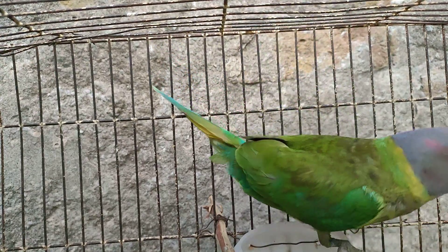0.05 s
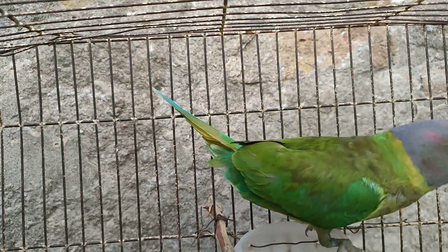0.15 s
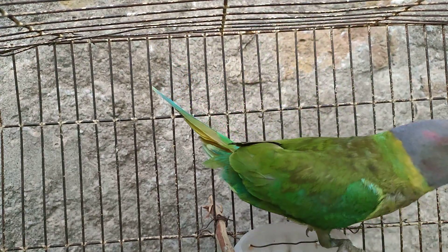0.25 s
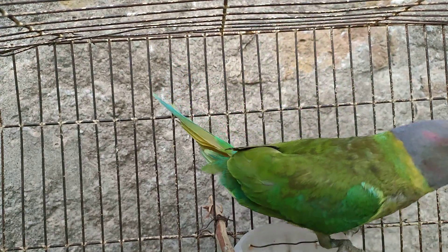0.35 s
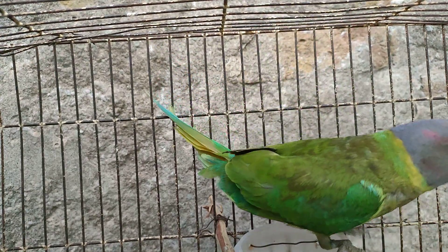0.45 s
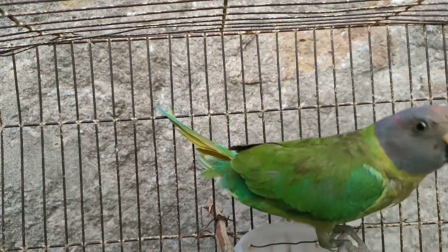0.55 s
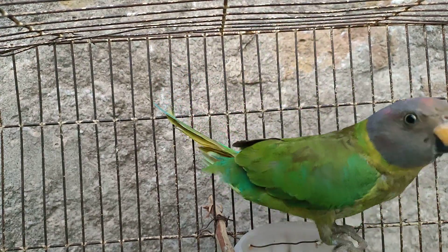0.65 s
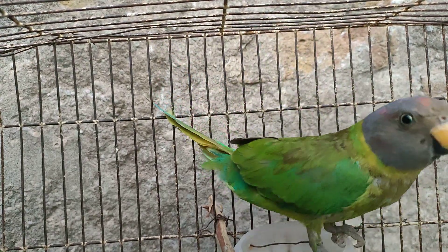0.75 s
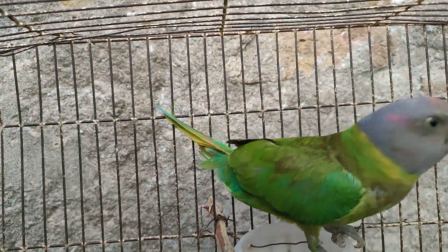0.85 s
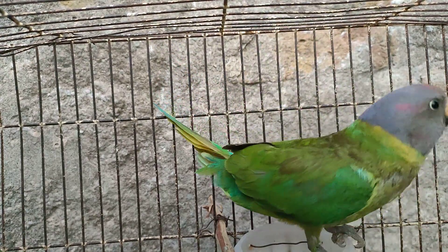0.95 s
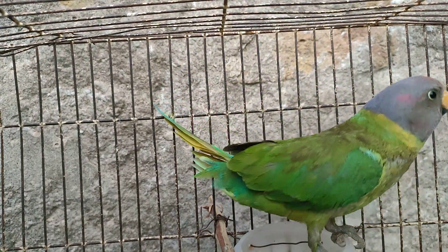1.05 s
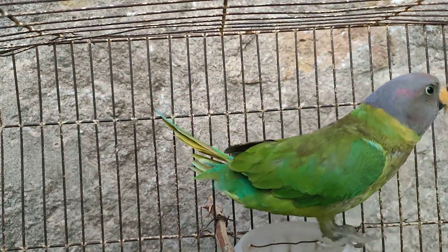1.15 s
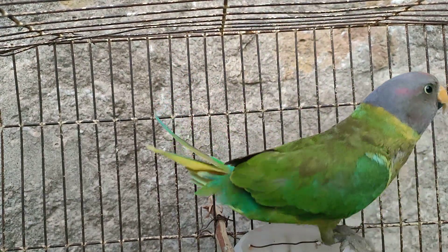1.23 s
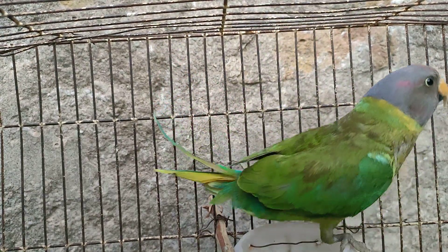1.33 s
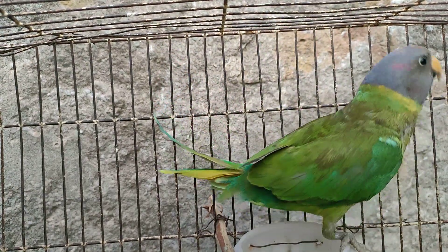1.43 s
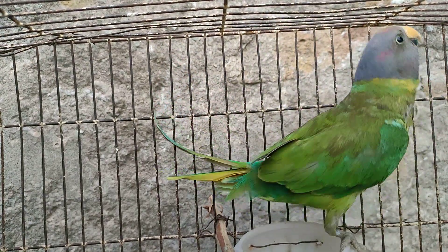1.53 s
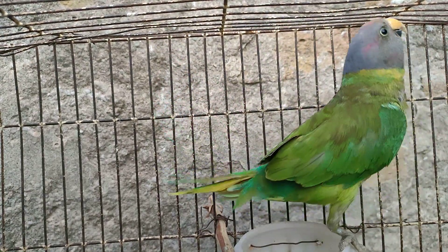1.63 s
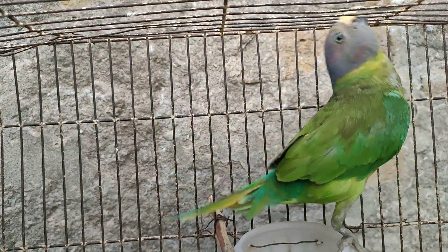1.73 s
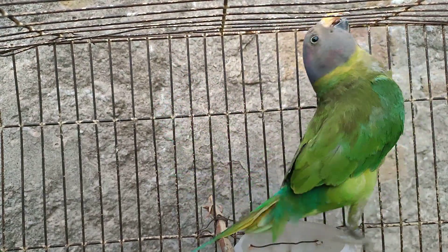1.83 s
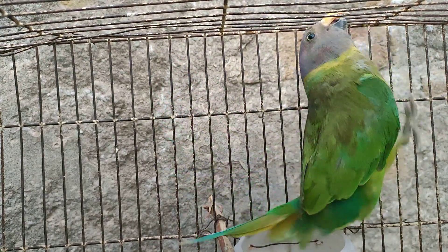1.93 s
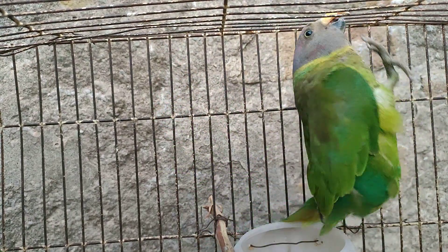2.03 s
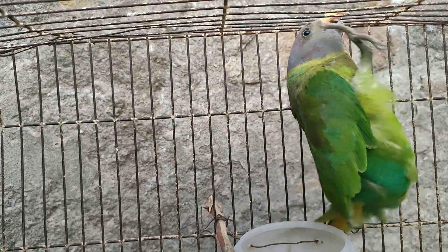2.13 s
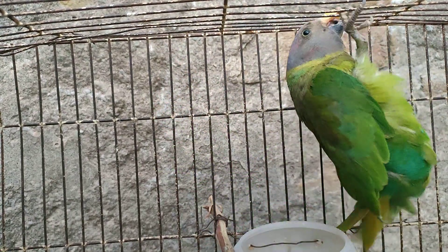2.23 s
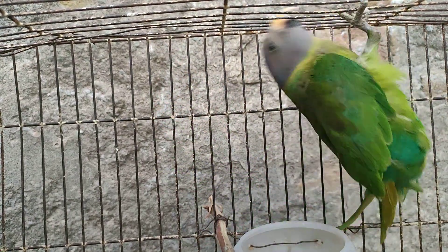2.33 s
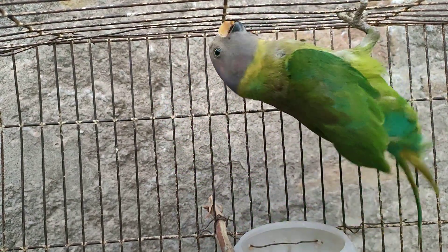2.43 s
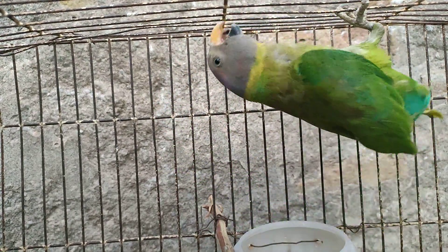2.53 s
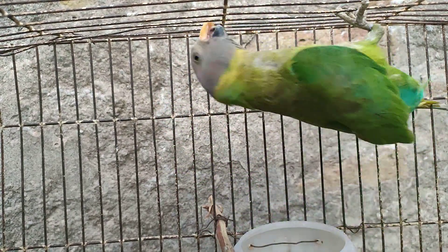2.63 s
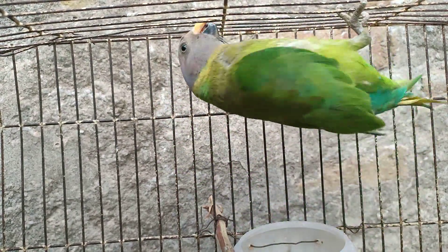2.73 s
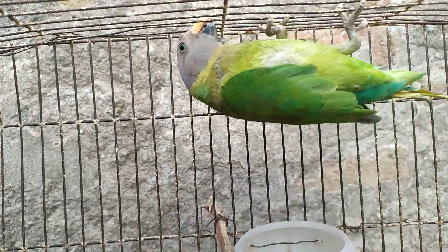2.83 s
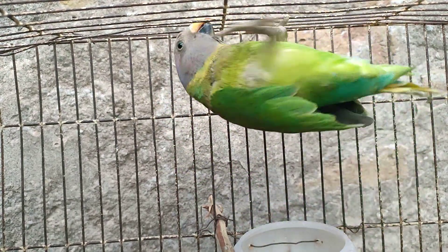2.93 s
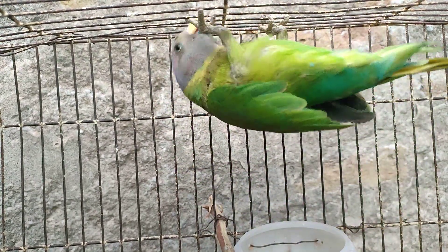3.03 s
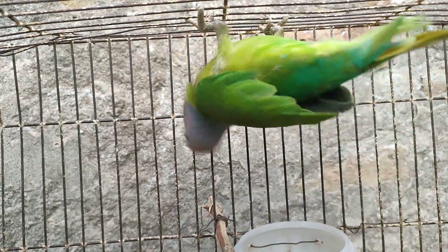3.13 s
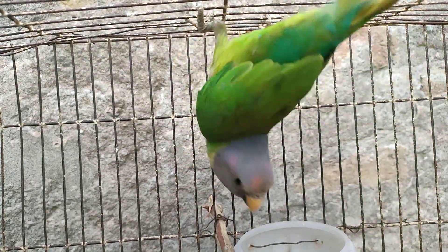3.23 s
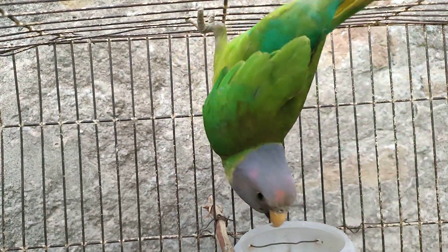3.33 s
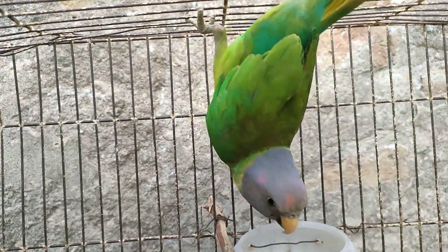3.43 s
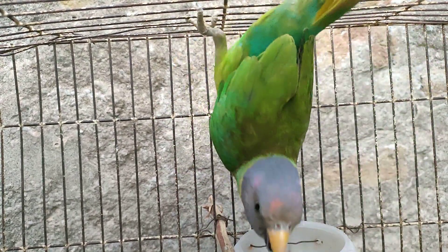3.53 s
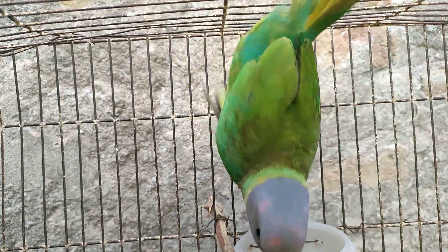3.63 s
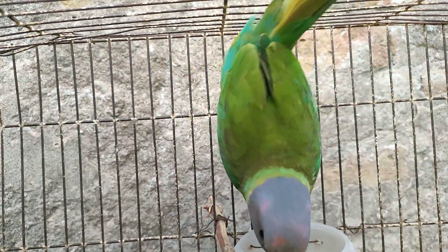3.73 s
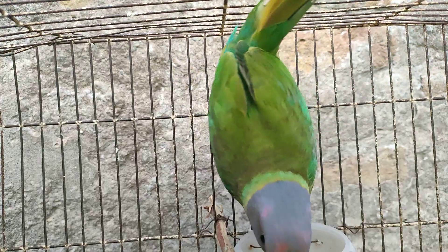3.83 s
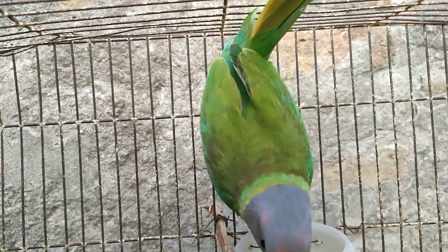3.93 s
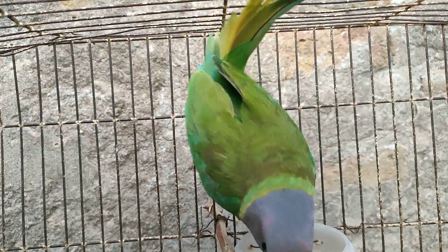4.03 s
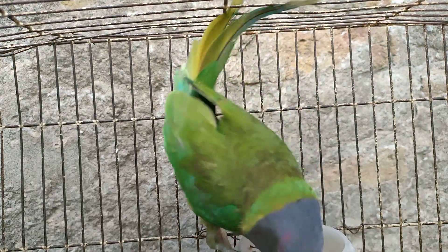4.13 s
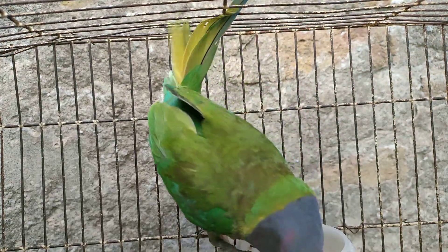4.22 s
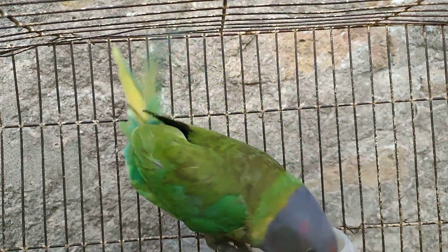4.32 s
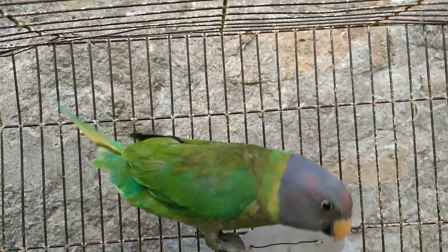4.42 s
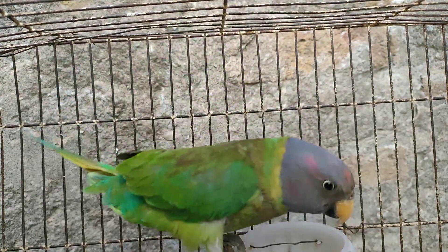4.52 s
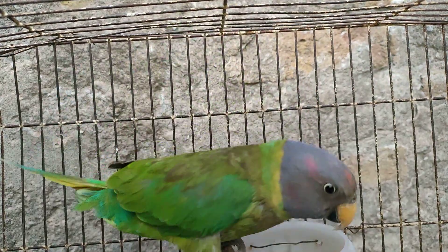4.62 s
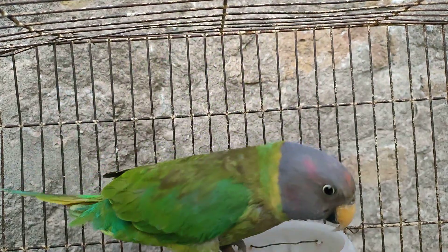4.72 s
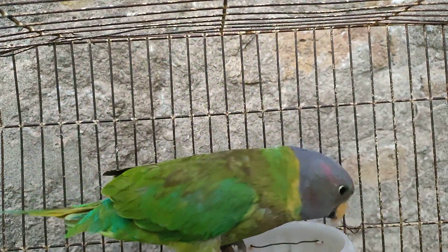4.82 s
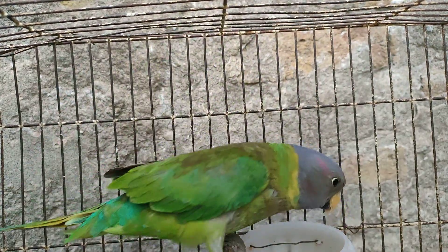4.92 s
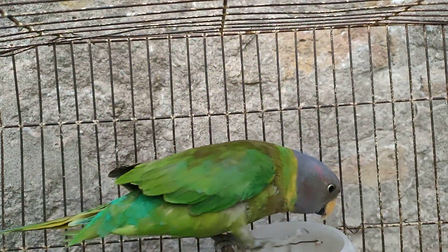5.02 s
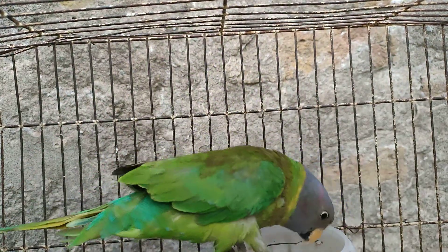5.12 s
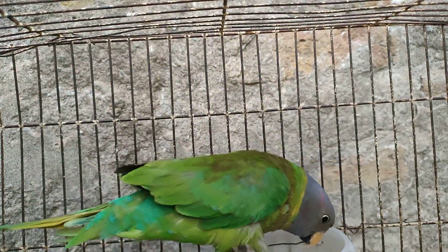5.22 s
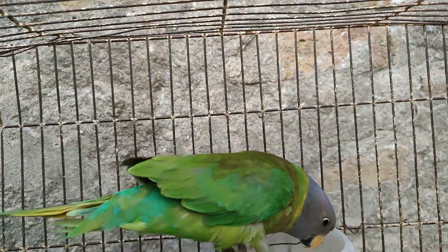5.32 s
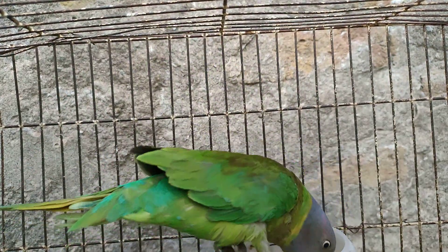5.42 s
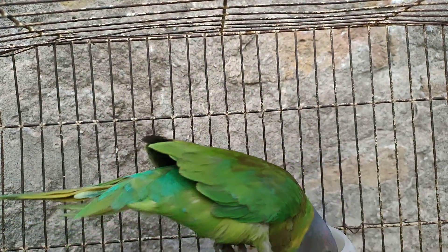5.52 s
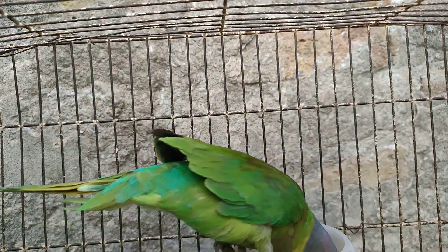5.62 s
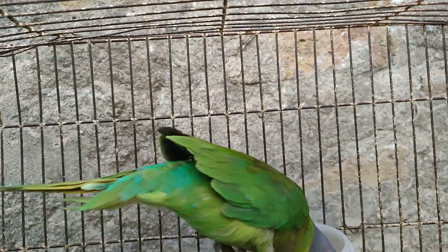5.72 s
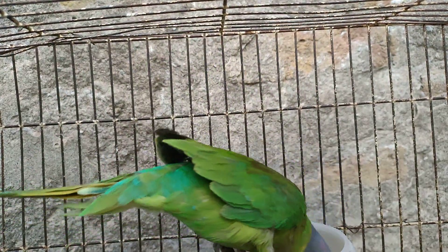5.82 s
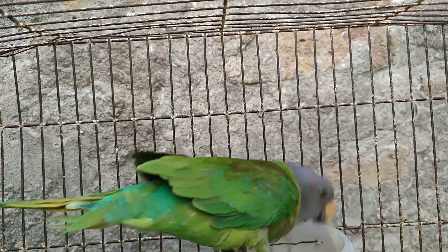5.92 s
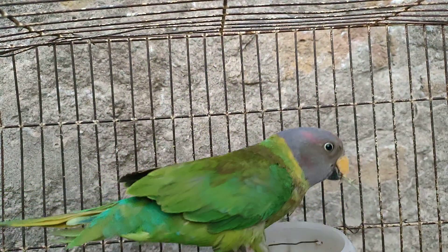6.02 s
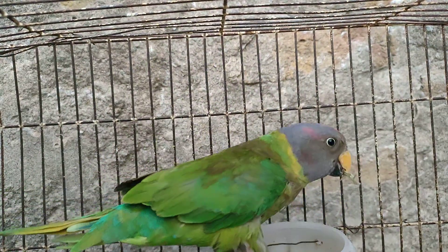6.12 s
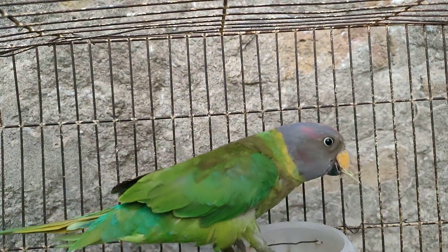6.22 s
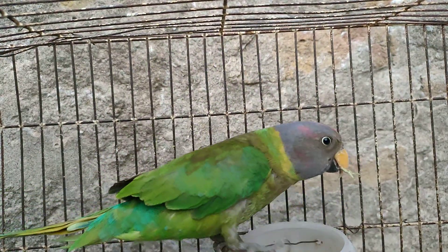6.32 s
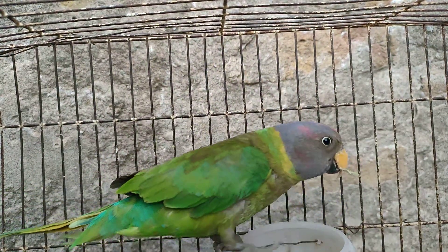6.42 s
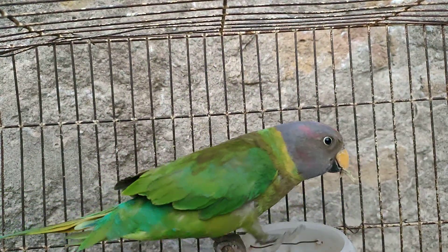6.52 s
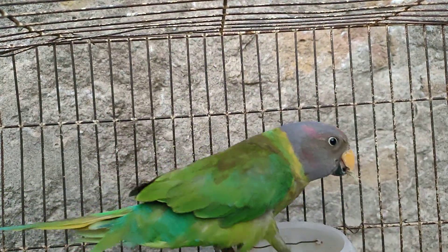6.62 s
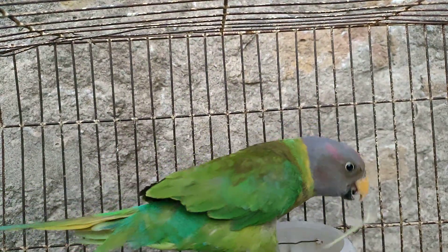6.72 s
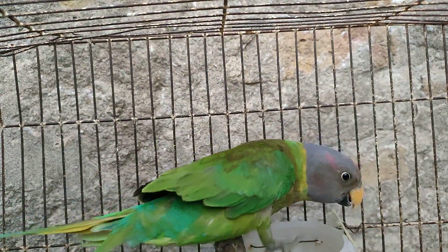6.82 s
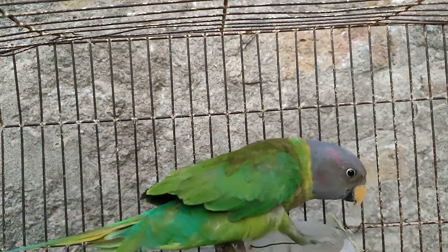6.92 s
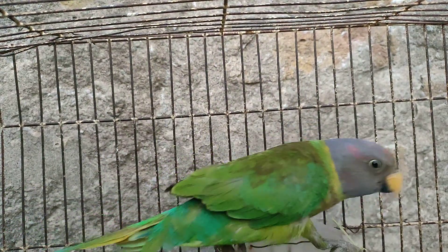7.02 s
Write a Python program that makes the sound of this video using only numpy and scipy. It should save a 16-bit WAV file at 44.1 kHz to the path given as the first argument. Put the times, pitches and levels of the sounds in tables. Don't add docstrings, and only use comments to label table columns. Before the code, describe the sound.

Sharp beak and claw ticks on thin cage wires, rattling mesh and plastic cup knocks, with distant bird whistles and a swelling low mains hum.

```python
import sys
import numpy as np
from scipy import signal
from scipy.io import wavfile
from scipy.ndimage import uniform_filter1d, minimum_filter1d

SR = 44100
rng = np.random.default_rng(int(sys.argv[2]) if len(sys.argv) > 2 else 0)


def store_pcm(level_fs):
    pcm = np.round(np.clip(level_fs, -1, 1) * 32767).astype(np.int16)
    wavfile.write(sys.argv[1], SR, np.atleast_2d(pcm).T)


def convert_level_to_amplitude(level_db):
    exponent = np.asarray(level_db, float) / 20
    return 10 ** exponent


N = 311346


def unit_rms(x):
    return x / np.sqrt(np.mean(x ** 2) + 1e-20)


def noise(ports=2):
    return rng.standard_normal((ports, N))


def at_hz(points, hz):
    f, value = np.transpose(points)
    return np.interp(np.log(hz + 1), np.log(f + 1), value)


def curves(rows, t):
    s, *columns = np.transpose(rows)
    return [np.interp(t, s, c) for c in columns]


def add(mix, s, sound):
    part = mix[:, round(s * SR):][:, :sound.shape[1]]
    part += sound[:, :part.shape[1]]


def ring(modes, phase_turns, length_s):
    t = np.arange(round(length_s * SR)) / SR
    return sum(convert_level_to_amplitude(db - 60 * t / t60) * np.sin(2 * np.pi * (hz * t + p))
               for (hz, t60, db), p in zip(modes, phase_turns))


def band(x, lo_hz, hi_hz, order=2):
    edges = np.clip([lo_hz, hi_hz], 5, SR / 2 - 100)
    return signal.sosfilt(signal.butter(order, edges, "band", fs=SR, output="sos"), x)


# (frequency [Hz], t60 [s], level [dB])
TICK_BODY = [(4080, 0.0052, -4), (4390, 0.0099, -34), (5650, 0.016, -10), (6440, 0.012, -18),
             (2861, 0.012, -18), (3400, 0.0052, -12)]
# (frequency [Hz], t60 [s], level [dB])
CUP = [(1080, 0.028, 0), (1420, 0.03, -8), (669, 0.1, -28), (2050, 0.012, -6)]


def strike(db, hz, cup_db, edge_db, pan_db, body_db, lag, phases, chatter):
    t = np.arange(chatter.shape[1]) / SR
    same = .5
    left = same * chatter[1] + np.sqrt(1 - same ** 2) * chatter[0]
    decay = convert_level_to_amplitude(-60 * np.maximum(t - .0035, 0) / .014) + convert_level_to_amplitude(-30 - 60 * t / .1)
    contact = np.array([left, chatter[1]]) * (1 - np.exp(-t / .0006)) * decay
    contact[:, 12] += 3
    contact[0] = np.roll(contact[0], shift=lag)

    body = [(f, t60, g + body_db) for f, t60, g in TICK_BODY]
    wire_ring = ring([(hz, .008, 4)] + body, phases, .05)
    wire = signal.fftconvolve(contact, wire_ring[None], axes=1)[:, :len(t)]
    snap = unit_rms(band(wire, hz * 0.73, 6570, order=3))
    snap = snap + 0.69 * unit_rms(band(contact, hz * 0.76, hz * 1.205))

    push = (contact + 0.88 * contact[::-1]) * convert_level_to_amplitude(-60 * t / 0.0039)
    cup = signal.fftconvolve(push, ring(CUP, 0 * phases, .08)[None], axes=1)[:, :len(t)]
    edge = band(contact * convert_level_to_amplitude(-60 * t / 0.025), 6700, 10300, order=1)
    thick_rods = band(contact, 2570, 3460)
    parts = [(snap, -.3), (band(cup, 470, 2900), cup_db + 7.0),
             (edge, edge_db + 10.5), (thick_rods, cup_db + 1.0)]
    sides = pan_db / 2 * np.array([[1], [-1]])
    return sum(convert_level_to_amplitude(db + g + sides) * x / abs(x.mean(0)).max() for x, g in parts)


# (time [s], peak [dB], ring [Hz], sharp edge [dB re peak])
TICKS = [(0.308, -31, 5510, -26), (0.6366, -24, 5840, -26), (0.828, -34, 5340, -40),
         (0.847, -44, 3780, -24), (0.8666, -21.5, 5700, -26), (1.2041, -42.5, 5660, -31),
         (1.253, -49, 5610, -23), (1.3359, -26.5, 5700, -21), (1.3515, -40, 5700, -26),
         (1.3858, -33.5, 4300, -19), (1.395, -38, 5500, -22), (1.978, -42, 5900, -20),
         (4.078, -48.5, 3720, -12), (4.3863, -42, 4000, -19), (4.4116, -43, 5730, -18),
         (4.501, -36, 3500, -30), (4.4574, -36, 4600, -13), (4.4925, -21.5, 5700, -21),
         (4.474, -48, 4800, -21), (4.578, -42, 5360, -12), (5.2768, -34, 5420, -24),
         (5.298, -42, 5520, -27), (5.325, -49, 5500, -26), (5.551, -53, 5500, -32), (6.039, -45, 5800, -21),
         (6.0543, -28.5, 5700, -26), (6.0632, -32, 5800, -26), (6.073, -36, 5500, -20),
         (6.109, -38, 5200, -25), (6.0803, -32.5, 6140, -21), (6.114, -31.5, 5700, -28),
         (6.1361, -24.5, 5720, -25), (6.1508, -29, 5230, -24), (6.876, -47, 5400, -29),
         (6.9273, -30.5, 5150, -32), (6.9526, -31.5, 4760, -20)]
# (time [s], peak [dB], ring [Hz], cup knock [dB re peak])
KNOCKS = [
    (1.8314, -35.5, 4860, -11),
    (3.182, -56, 4000, -13),
    (3.733, -21.5, 4100, -11.5),
    (3.7878, -23, 5120, -19),
    (3.803, -18.5, 3910, -19),
    (4.2345, -26, 4300, -18.5),
    (4.3172, -13, 4700, -15.5),
    (5.765, -51, 3450, -2),
    (6.745, -25, 4800, -30),
    (6.776, -37.5, 3840, -9),
]


def ticks_and_knocks():
    out = np.zeros((2, N))
    # time, peak dB, ring Hz, cup dB, edge dB, pan dB, neighbouring wires dB, left port lag in samples
    hits = [(s, db, hz, -30.5, edge_db, 0, -4.5, 0) for s, db, hz, edge_db in TICKS]
    hits += [(s, db, hz, cup_db, -31.5, 2.5, 4, -2) for s, db, hz, cup_db in KNOCKS]
    for s, *settings in hits:
        add(out, s, strike(*settings, rng.random(7), rng.standard_normal((2, 4000))))
    return out


GRIP_T60_S = .13


def rattle(modes, per_s, spread_db):
    out = np.zeros((2, N))
    for hz, t60, db in modes:
        chance = rng.random((2, N)) * SR / per_s
        taps = (chance < 1) * convert_level_to_amplitude(spread_db * np.minimum(-np.log(chance + 1e-9), 4))
        rod = ring([(hz, min(t60, GRIP_T60_S), db)], [0], 0.2)
        out += signal.oaconvolve(taps, rod[None], axes=1)[:, :N]
    return unit_rms(out / np.sqrt(uniform_filter1d((out ** 2).mean(0), size=4000) + 1e-12))


# (time [s], effort [0-1])
EFFORT = [(0, 0.3), (0.55, 0.2), (0.77, 0.85), (1.0, 0.14), (1.8, 0.45), (2.06, 0.2), (2.6, 0.2),
          (2.7, 0.3), (2.83, 0.21), (3.7, 0.1), (3.87, 0.83), (4.13, 0.97), (4.38, 1), (4.55, 0),
          (6.09, 0.03), (6.27, 0.77), (6.5, 0.26), (7.06, 0.24)]
# (level at rest [dB], level at full effort [dB])
SHAKEN = [(-71.5, -53.5), (-56.5, -49.5), (-101.5, -55.5)]
# (time [s], peak [dB], low body [dB re peak], t60 [s])
SCUFFS = [(0.031, -35.5, -12, 0.37), (0.767, -41.5, -38, 0.49), (1.827, -38.5, 4.5, 0.82),
          (2.072, -46.5, -0.5, 1), (2.2657, -49, -31, 0.078), (2.372, -40.5, -48, 0.2),
          (2.438, -33.5, -2, 0.14), (2.451, -36.5, 4, 0.55), (2.534, -37.5, 7, 0.33),
          (2.661, -39.5, -1.5, 1), (3.0117, -43, -2, 0.23), (3.182, -37.5, 5, 0.19),
          (3.694, -37.5, -11, 0.27), (3.7616, -38.5, 3.5, 0.15), (3.8144, -34.5, -24, 0.21),
          (4.2347, -33, -13, 0.12), (4.257, -32, -13, 0.6), (4.325, -48, -13, 0.48),
          (6.0563, -34, -41, 0.2), (6.25, -44.5, -31, 0.81), (6.778, -48, 10, 0.17),
          (6.932, -28.5, -14, 0.093)]
# (time [s], peak [dB], t60 [s])
BRUSHES = [(0.023, -43, 0.25), (1.53, -53, 0.11), (1.72, -57.5, 0.2), (1.901, -47, 0.46), (1.97, -64, 0.16),
           (2.069, -43.5, 0.87), (2.265, -61, 0.096), (2.372, -53, 0.098), (2.448, -40, 0.16),
           (2.521, -40.5, 0.16), (2.649, -46.5, 0.67), (3.011, -40.5, 0.15), (3.696, -44, 0.27),
           (4.456, -62, 0.12), (6.159, -50.5, 1), (6.3, -49, 0.66), (6.506, -62, 0.93), (6.77, -50, 0.24)]
SCUFF_RISE_S, SCUFF_HOLD_S = .005, .023


def effort():
    t, after = np.arange(N) / SR, np.arange(SR // 2) / SR
    work = curves(EFFORT, t)[0]
    gains = convert_level_to_amplitude([rest + (full - rest) * work for rest, full in SHAKEN])
    bursts = [(s, [db, db + body, db - 27 - 0.31 * body], t60) for s, db, body, t60 in SCUFFS]
    bursts += [(s, [db + 0.5, -99, db], t60) for s, db, t60 in BRUSHES]
    for s, dbs, t60 in bursts:
        decay = convert_level_to_amplitude(-8.0 - 60 * np.maximum(after - SCUFF_HOLD_S, 0) / t60)
        add(gains, s, convert_level_to_amplitude(dbs)[:, None] * (1 - np.exp(-after / SCUFF_RISE_S)) * decay)
    return gains


# (frequency [Hz], t60 [s], level [dB])
WIRES = [(2460, 0.12, -8), (2880, 0.15, -4.5), (3190, 0.24, -1.5), (3820, 0.09, 2.5), (4000, 0.21, 2.5),
         (4404, 0.2, 2.5), (4790, 0.24, 1), (5230, 0.16, 2.5), (5700, 0.27, 1.5), (5880, 0.15, -3.5),
         (6030, 0.18, -4), (6660, 0.26, -8.5), (7040, 0.14, -4.5), (7600, 0.11, -24)]
# (frequency [Hz], t60 [s], level [dB])
FRAME = [(620, 0.056, 2.5), (930, 0.018, 8.5), (1073, 0.055, -3.5), (1160, 0.13, -6), (1402, 0.11, -1.5),
         (1670, 0.25, -2), (2252, 0.24, -11.5)]


def climbing():
    wires, frame, hiss = effort()
    grit = noise() * convert_level_to_amplitude(2.6 * unit_rms(band(noise(1)[0], 12, 150)))
    grit[0] += 0.098 * np.roll(grit[1], shift=18)
    wires = wires * (.5 * rattle(WIRES, 300, 2.7) + 0.35 * unit_rms(band(grit, 2920, 6260, order=4)))
    thud = 0.12 * unit_rms(band(grit[1], 130, 350))
    frame = frame * (0.38 * rattle(FRAME, 100, 1.7) + 0.61 * unit_rms(band(grit, 460, 3990)) + thud)
    return wires + frame + hiss * unit_rms(band(grit, 7000, 14000))


def twangs():
    out = np.zeros((2, N))
    for s, db, body, hold in SCUFFS:
        modes = WIRES + [(hz, t60, g + body + 4) for hz, t60, g in FRAME]
        spread, *phases = rng.random((3, len(modes)))
        struck = []
        for (hz, t60, g), k, p in zip(modes, spread, phases[0]):
            struck.append((hz * (.98 + .04 * p), min(t60, hold, GRIP_T60_S), g + 4 * (2 * k - 1)))
        level = convert_level_to_amplitude(db - 23 + .5 * min(body, 0))
        add(out, s, level * np.array([ring(struck, p, 0.35) for p in phases]))
    return out


# (time [s], length [s], level [dB])
SCRAPES = [
    (3.74, .04, -54),
    (3.801, 0.041, -52),
    (4.241, 0.033, -54),
    (4.258, 0.091, -39),
    (4.318, 0.054, -45.5),
    (4.497, 0.033, -52),
    (6.059, 0.035, -50.5),
    (6.931, 0.034, -52),
]


def scrapes():
    gain = np.zeros((1, N))
    for s, length, db in SCRAPES:
        add(gain, s, convert_level_to_amplitude(db) * signal.windows.tukey(round(length * SR), .6)[None])
    slips_per_s, spread_db = 1500, 2
    size = convert_level_to_amplitude(spread_db * np.minimum(rng.exponential(1, (2, N)), 4))
    slips = (rng.random((2, N)) < slips_per_s / SR) * size * rng.choice([-1., 1.], (2, N))
    slips[0] += 0.8 * np.roll(slips[1], shift=-2)
    rods = signal.oaconvolve(slips, ring(WIRES[3:13], np.zeros(10), 0.06)[None], axes=1)[:, :N]
    return gain * (unit_rms(band(slips, 3900, 5550, order=3)) + unit_rms(rods))


# (frequency [Hz], t60 [s], level [dB])
ROOF_RODS = [(1147, 0.22, 1.5), (1760, .5, 1.5), (2256, .35, 2), (2692, 0.17, 0), (3900, 0.32, 4.5),
             (4050, .45, 2), (4447, .16, -11), (5200, .3, -2), (5280, .22, 3.5), (5916, .25, -6),
             (6040, .25, -5), (6896, .2, -6)]
# (frequency [Hz], t60 [s], level [dB])
LOW_RODS = [(950, .2, -4), (1400, .2, -4), (2299, .3, -3), (3000, .22, 0), (3430, 0.34, -3), (4215, .17, 5),
            (4797, .3, -6), (5109, .3, -2), (5943, .25, -6), (6815, .25, -8), (7020, .25, -8)]
# (frequency [Hz], t60 [s], level [dB])
SIDE_RODS = [(1087, .15, 0), (1701, .4, -8), (2374, .16, -6), (3171, .19, -2), (3461, 0.17, 0),
             (4544, .3, -4), (5130, .4, 1), (6412, .1, -10)]
# (rods, time [s], peak [dB])
CLANGS = [
    (ROOF_RODS, 3.182, -50),
    (SIDE_RODS, 1.6, -51),
    (SIDE_RODS, 2.2, -48),
    (LOW_RODS, 2.534, -48),
]


def clangs():
    out = np.zeros((2, N))
    for rods, s, db in CLANGS:
        sound = []
        for mix, phases in rng.random((2, 2, len(rods))):
            heard = [(hz, t60, g + 6 * k - 3) for (hz, t60, g), k in zip(rods, mix)]
            sound.append(ring(heard, phases, .3))
        swell = 1 - np.exp(-np.arange(len(sound[0])) / SR / SCUFF_RISE_S)
        add(out, s, convert_level_to_amplitude(db) * np.array(sound) * swell)
    return out


# (time [s], peak [dB], t60 [s])
WOBBLES = [(1.83, -56, 0.25), (2.53, -59, 0.44), (2.72, -48, 0.79), (3.02, -55, 0.8), (3.185, -45.5, 0.36),
           (3.736, -47, 0.35), (3.803, -42.5, 0.39), (3.99, -49.5, 0.52), (4.061, -65, .5),
           (4.318, -45, .2)]


def wobbles():
    gain, after = np.zeros((1, N)), np.arange(SR // 2) / SR
    for s, db, t60 in WOBBLES:
        add(gain, s, ((1 - np.exp(-after / SCUFF_RISE_S)) * convert_level_to_amplitude(db - 60 * after / t60))[None])
    a, b = noise()
    return gain * unit_rms(band(np.array([a + .5 * b, a - .5 * b]), 250, 980))


def note(length_s, first_hz, last_hz, db):
    u = np.arange(0, length_s, 1 / SR) / length_s
    hz = first_hz + (last_hz - first_hz) * u ** 2 * (3 - 2 * u)
    luck = rng.standard_normal((4, len(u)))
    husk, waver = (unit_rms(band(v, 20, 200)) for v in luck[:2])
    drift = np.array([unit_rms(band(v, 8, 50)) for v in luck[2:]])
    turns = np.cumsum(hz * (1 + .004 * waver)) / SR + .08 * drift
    breath = (1 + .35 * husk) * signal.windows.tukey(len(u), .6) * convert_level_to_amplitude(2 - 4 * u)
    return np.sqrt(2) * convert_level_to_amplitude(db) * breath * np.sin(2 * np.pi * turns)


# (time in phrase [s], length [s], first [Hz], last [Hz], level [dB])
LEAD_IN = [(.001, .022, 3850, 3700, -51), (.012, .02, 3600, 3300, -57), (.024, .012, 2900, 2850, -59),
           (.045, .014, 4700, 4550, -56), (.057, .012, 4350, 4200, -60), (.068, .052, 3440, 3420, -52)]
# (time in phrase [s], length [s], first [Hz], last [Hz], level [dB])
RISE = [(.003, .047, 4080, 4260, -55), (.036, .052, 4280, 4950, -51), (.05, .065, 4130, 4180, -60),
        (.082, .04, 4950, 5550, -54), (.112, .066, 5580, 5760, -51.5)]
# (time in phrase [s], length [s], first [Hz], last [Hz], level [dB])
SHORT_RISE = [(0, .048, 4080, 4250, -55), (.04, .036, 4350, 4650, -53), (.05, .07, 4100, 4150, -63),
              (.07, .04, 4750, 4920, -52), (.1, .04, 4900, 4950, -60), (.115, .04, 5250, 5450, -61)]
# (time in phrase [s], length [s], first [Hz], last [Hz], level [dB])
CHATTER = [(0, .02, 4740, 4650, -55), (.01, .013, 3950, 3750, -54), (.038, .042, 3780, 3830, -56),
           (.083, .04, 6800, 6200, -50.5), (.117, .013, 5950, 5800, -56), (.124, .028, 5200, 4600, -47),
           (.142, .025, 4420, 4250, -59)]
# (phrase, time [s], level [dB])
SONG = [
    (LEAD_IN, 0.337, -1.5),
    (RISE, .458, 0.),
    (CHATTER, 2.706, -1.),
    (LEAD_IN, 3.405, -2.5),
    (SHORT_RISE, 3.527, 0.),
    (CHATTER, 6.263, 0.),
]
# (time [s], length [s], first [Hz], last [Hz], level [dB])
WHISTLES = [
    (2.893, 0.017, 4600, 4330, -72),
    (6.296, .02, 3700, 3805, -48),
    (6.334, .01, 3900, 3600, -54),
    (6.347, 0.014, 4000, 3700, -53),
    (6.448, .025, 3520, 3490, -57),
    (6.481, 0.016, 3940, 3820, -55),
    (1.078, 0.177, 2025, 1930, -63),
    (6.481, 0.064, 2440, 2477, -67),
    (6.694, 0.072, 2420, 2470, -58.5),
    (6.945, 0.054, 2460, 2460, -64),
]


def far_song():
    song = np.zeros((2, N))
    notes = [(s + at, *shape, db + level) for phrase, s, db in SONG for at, *shape, level in phrase]
    for s, *shape in notes + WHISTLES:
        add(song, s, note(*shape))
    song[0] = np.roll(song[0], shift=20)
    return convert_level_to_amplitude([[2.5], [4]]) * song


def walls(x, t60):
    length = SR // 2
    taps = np.zeros((2, length))
    at = np.arange(200, length - 20, 20)
    at = at + rng.integers(0, 20, (2, len(at)))
    np.put_along_axis(taps, at, rng.choice([-1., 1.], at.shape), 1)
    taps *= convert_level_to_amplitude(-60 * np.arange(length) / SR / t60)
    return signal.fftconvolve(x, taps / np.linalg.norm(taps[0]), axes=1)[:, :N]


# (time [s], level [dB], frequency [Hz])
HUM = [(0.0, -44.5, 50.5), (0.55, -55, 49.1), (0.79, -42.5, 48.8), (1.43, -46.5, 51), (1.73, -29, 50.4),
       (2.6, -27.5, 50.85), (2.87, -29.5, 51.6), (3.23, -25, 51.5), (3.5, -31.5, 51.7), (3.8, -25.5, 51.2),
       (4.01, -26, 51.6), (4.13, -31.5, 51.7), (4.46, -23.5, 50.8), (4.58, -36.5, 51.5),
       (5.31, -36.5, 51.5), (5.56, -40.5, 50.54), (6.6, -37, 51.2), (7.06, -41.5, 51.9)]


def hum():
    t = np.arange(N) / SR
    level_db, hz = curves(HUM, t)
    hang = uniform_filter1d(1. * (t > 1.6) * (t < 4.55), size=SR // 8)
    grip, throb, low, loose = noise(4)
    level = convert_level_to_amplitude(level_db + unit_rms(band(grip, 3, 9.8)))
    octave = convert_level_to_amplitude(-58 + 5.5 * hang) * (1 + 0.084 * unit_rms(band(throb, 1.8, 15)))
    shudder = unit_rms(band(low, 30, 72, order=4))
    buzz = unit_rms(band(loose, 128, 233))
    tone = level * np.sin(2 * np.pi * np.cumsum(hz) / SR) + octave * np.sin(2 * np.pi * 100.55 * t)
    return np.sqrt(2) * tone * np.array([[1], [.96]]) + level * (convert_level_to_amplitude(-23.5) * shudder + convert_level_to_amplitude(-33) * buzz)


# (frequency [Hz], level [dB per Hz])
AIR = [(15, -32), (25, -9.5), (59, -10), (79, -35.5), (97, -3), (285, -12), (400, -15), (481, -13),
       (1170, -13.5), (1600, -17.5), (2700, -22), (4690, -28.5), (6940, -79), (9010, -93), (13000, -74)]
# (frequency [Hz], left-right likeness [0-1])
AIR_SAME = [(60, 1), (250, 0.67), (650, 0.69), (1400, 0.8), (3000, 0.18), (6000, 0.19)]
# (frequency [Hz], lag [samples])
AIR_LAG = [(100, 3.5), (650, 13), (1400, 20.6), (15000, 3.5)]


def yard():
    frames, hz = N // 256 + 5, np.fft.rfftfreq(1024, 1 / SR)
    a, b, c, d, patches = rng.standard_normal((frames, 513, 5)).T
    patches = uniform_filter1d(uniform_filter1d(patches, size=10, axis=0), size=16, axis=1)
    same, right = at_hz(AIR_SAME, hz)[:, None], a + 1j * b
    late = np.exp(-2j * np.pi * hz * at_hz(AIR_LAG, hz) / SR)[:, None]
    z = np.array([same * late * right + np.sqrt(1 - same ** 2) * (c + 1j * d), right])
    z *= convert_level_to_amplitude(at_hz(AIR, hz)[:, None] + 1.48 * unit_rms(patches))
    wash = unit_rms(signal.istft(z, nperseg=1024, noverlap=768)[1][:, :N])
    drone = unit_rms(band(noise(1)[0], 466, 502))
    return convert_level_to_amplitude(-49.5) * wash + convert_level_to_amplitude(-62) * drone


# (frequency [Hz], threshold on unit chance)
DROPPED = [(2000, -3.2), (3500, -2.4), (6000, -1.5), (8000, -.4), (16000, -.2)]
# (frequency [Hz], threshold [dB re local mean])
COARSE = [(2500, -30), (4500, -12), (6500, -3), (8500, 2), (16000, 4)]


def thinned(x, song):
    top_hz, top_gate_db, masked_db, masked_from_hz = 12700, -110, -9, 5400
    window = np.sin(np.pi * (np.arange(2048) + .5) / 2048)
    hz, _, z = signal.stft(x, SR, window, nperseg=2048, noverlap=1024)
    row_hz = hz[:, None]
    power = abs(z) ** 2
    local = abs(uniform_filter1d(power, size=64, axis=1))
    loud_top = local.mean(0) > convert_level_to_amplitude(2 * top_gate_db)
    busy = loud_top[hz > top_hz].mean(0) * (row_hz > 2400)
    cells = rng.standard_normal((z.shape[2], 86))
    cells = unit_rms(uniform_filter1d(cells, size=2, axis=0)).T
    kept = cells[np.arange(len(hz)) // 12] > at_hz(DROPPED, hz)[:, None] + .9 * busy
    kept = kept * (power > local * convert_level_to_amplitude(2 * at_hz(COARSE, hz))[:, None])
    kept = kept * (loud_top | (row_hz < top_hz))

    whistle = signal.stft(song, SR, window, nperseg=2048, noverlap=1024)[2]
    whistle = abs(whistle * (row_hz > .8 * masked_from_hz)) ** 2
    above = -minimum_filter1d(-whistle, size=80, axis=1, origin=39)
    weak = uniform_filter1d(power, size=12, axis=1) < above * convert_level_to_amplitude(2 * masked_db)
    masked = weak & (whistle < above * convert_level_to_amplitude(-36)) & (row_hz > masked_from_hz)
    return signal.istft(z * kept * ~masked, SR, window, nperseg=2048, noverlap=1024)[1][:, :N]


def scene():
    near, song = ticks_and_knocks(), far_song()
    echo = convert_level_to_amplitude(-5) * walls(song, 0.2) + convert_level_to_amplitude(-15) * walls(near, 0.13)
    steady = climbing() + twangs() + clangs() + wobbles() + echo + yard()
    return near + scrapes() + song + thinned(steady, song) + hum()


def low_pass(x):
    return signal.sosfilt(signal.butter(12, 16450, fs=SR, output="sos"), x)


def record(dry):
    taps = signal.firwin(255, 15900, fs=SR)
    mix = signal.oaconvolve(dry, taps[None], "same")
    return low_pass(mix)


dry = scene()
out = record(dry)
store_pcm(out)
```